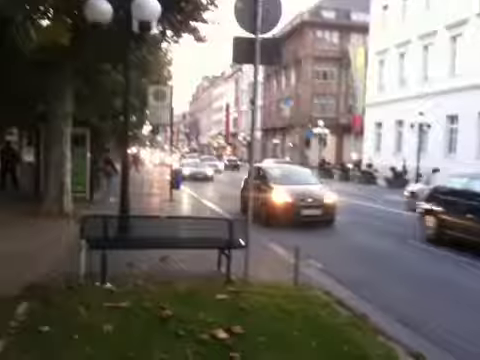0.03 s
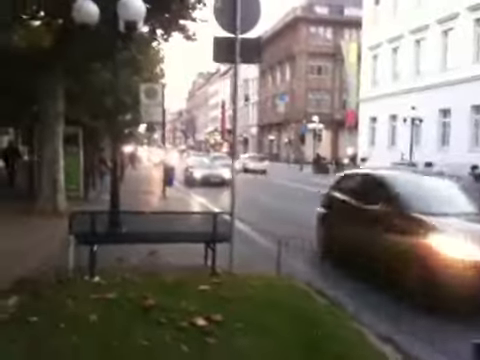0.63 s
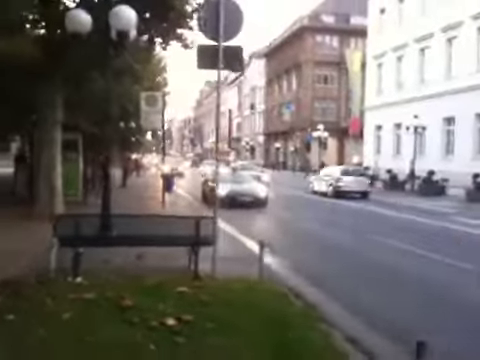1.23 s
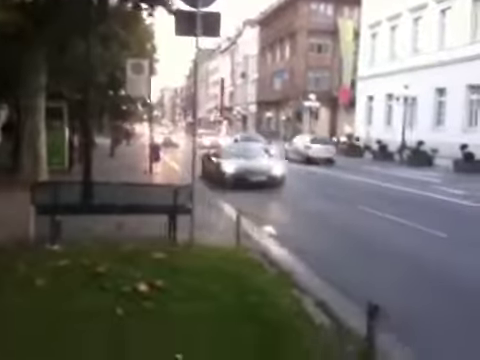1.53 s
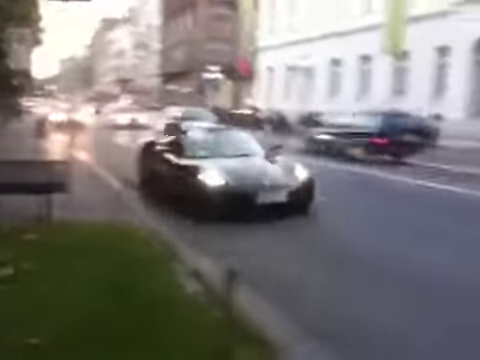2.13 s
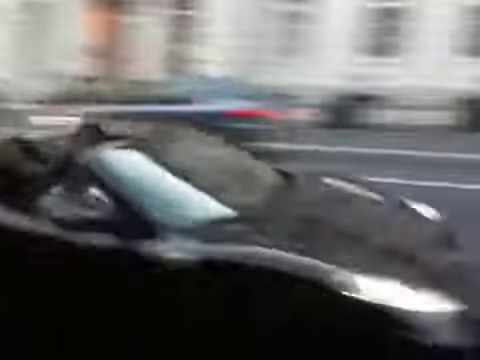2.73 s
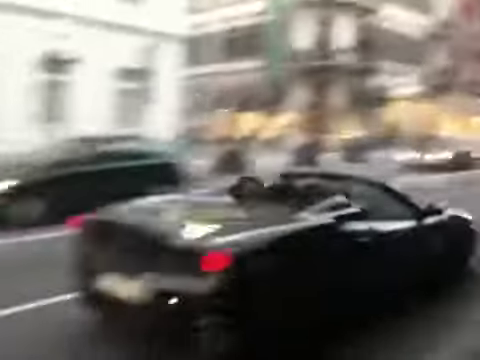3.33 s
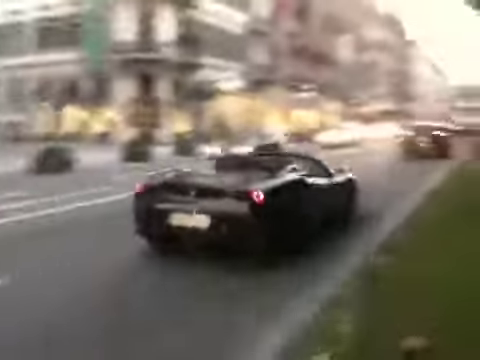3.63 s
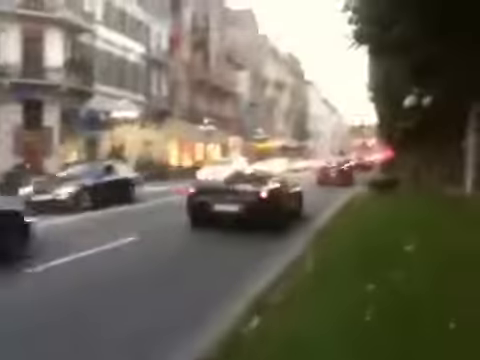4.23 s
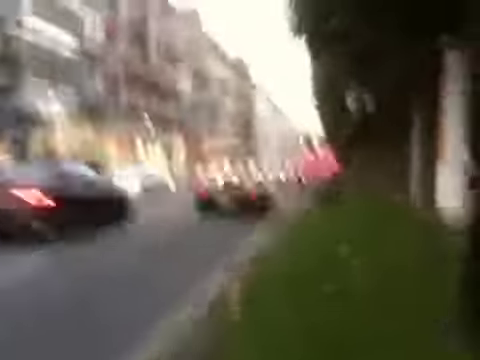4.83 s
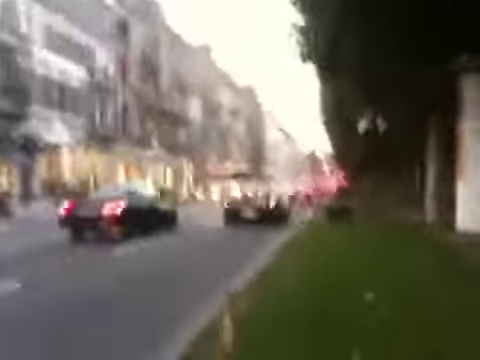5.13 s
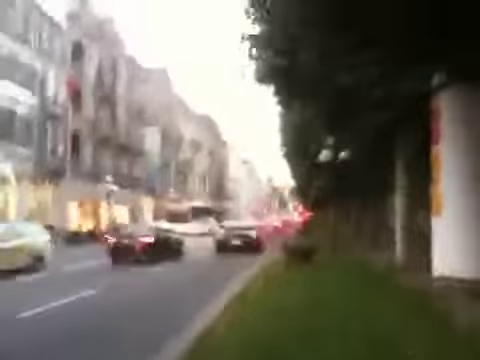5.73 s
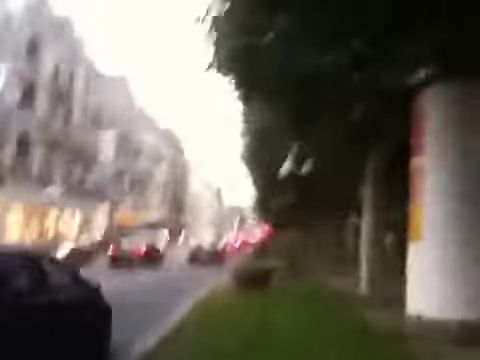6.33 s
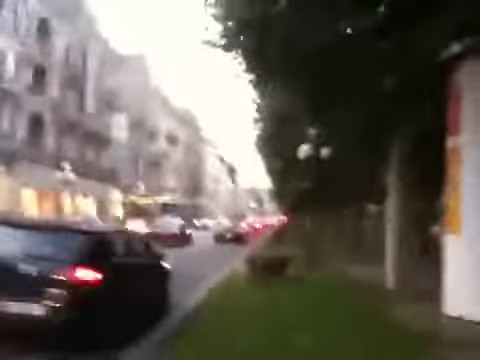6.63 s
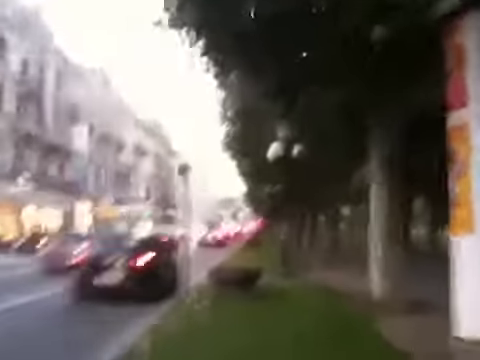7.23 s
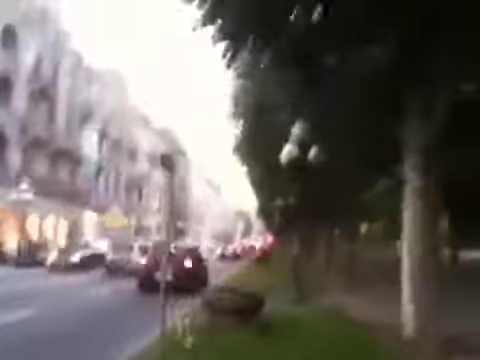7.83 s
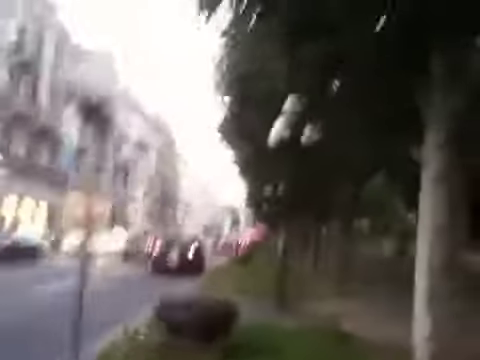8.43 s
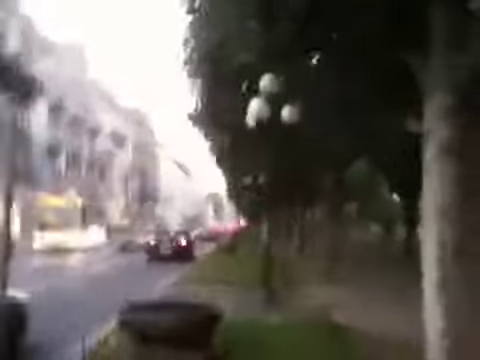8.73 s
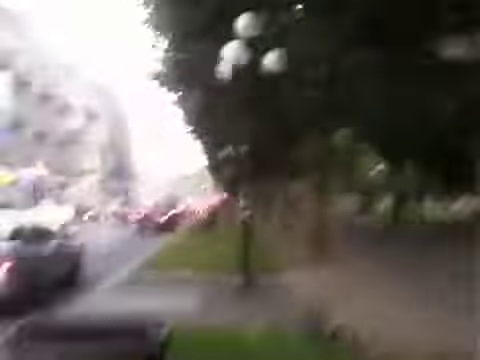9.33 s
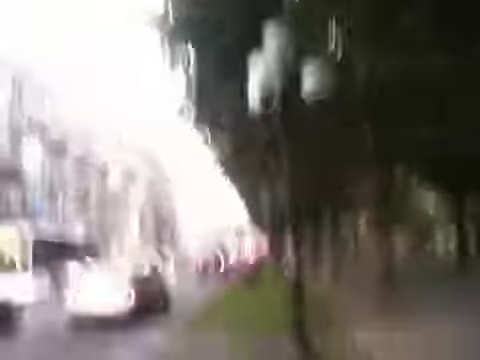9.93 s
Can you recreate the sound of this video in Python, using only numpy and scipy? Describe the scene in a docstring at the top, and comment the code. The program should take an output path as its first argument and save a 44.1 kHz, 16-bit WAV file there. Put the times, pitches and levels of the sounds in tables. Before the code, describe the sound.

Amid passing traffic, a sports car engine drones closer, blasts by with a raspy crack, then revs higher and fades with soft pops.

```python
"""A city street: a sports car cruises up, opens its throttle beside the microphone and roars away.
Periodic firing makes a harmonic drone, coloured by pipe resonances. At close range shock fronts and
turbulent gas rasp and crack; uneven combustion burbles, and unburnt fuel pops in the pipe.
Other cars roll past on hissing tyres, and the house fronts reflect the exhaust sound."""
import sys
import numpy as np
from scipy import signal
from scipy.fft import rfft, irfft
from scipy.io import wavfile
from scipy.ndimage import uniform_filter1d

SR = 44100
rng = np.random.default_rng(int(sys.argv[2]) if len(sys.argv) > 2 else 0)


def master_out(mix):
    """Clip the mix to full scale and print it as 16-bit PCM to the path in sys.argv[1]."""
    frames = np.transpose(np.atleast_2d(mix))
    ceiling = np.clip(frames, -1, 1)
    pcm = np.round(ceiling * 32767).astype(np.int16)
    wavfile.write(sys.argv[1], SR, pcm)


N = 440118
TIME = np.arange(N) / SR
PASS_S, PASS_WIDTH_S = 3.272, 0.24  # closest approach; the car's distance then, divided by its speed
BURST_PHASE = .17  # where the gas burst falls in each firing cycle [turns]
# the silencer's response: (frequency [Hz], gain [dB])
SILENCER = [(40, -31.5), (85, -29), (125, -6), (170, 4), (250, 0), (350, -3.5), (480, -9), (700, -15.5),
            (1200, -22), (3000, -63)]


def amp(db):
    """Decibels to amplitude ratio."""
    return 10 ** (np.asarray(db) / 20)


def unit(x):
    """Normalisation to rms 1."""
    return x / np.sqrt(np.mean(x ** 2) + 1e-20)


def curves(rows):
    """Linear interpolation of each column of a table over time."""
    s, *columns = np.transpose(rows)
    return [np.interp(TIME, s, c) for c in columns]


def read(points, hz):
    """Interpolation of a spectrum at hz, on a logarithmic frequency axis."""
    f, value = np.transpose(points)
    return np.interp(np.log(hz + 1), np.log(f + 1), value)


def hump(s, half_s):
    """A Gaussian envelope of height 1 around time s."""
    return np.exp(-((TIME - s) / half_s) ** 2)


def wander(hz):
    """Random modulation: noise of rms 1, low-passed at hz."""
    count = N // 64 + 2
    f = np.fft.rfftfreq(count, 64 / SR)
    slow = irfft(rfft(rng.standard_normal(count)) / (1 + (f / hz) ** 4))
    return unit(np.interp(np.arange(N) / 64, np.arange(len(slow)), slow))


def ring(colour, size=4096):
    """The minimum-phase impulse response of a body with this spectrum."""
    log_gain = np.log(amp(read(colour, abs(np.fft.fftfreq(size, 1 / SR)))))
    return np.fft.ifft(np.exp(np.conj(signal.hilbert(log_gain)))).real[:size // 2]


def through(x, colour):
    """Convolution with a body's impulse response, scaled to rms 1."""
    return unit(signal.oaconvolve(x, ring(colour))[:N])


def add(mix, s, sound):
    """Superposition: adds a sound at s seconds."""
    part = mix[max(round(s * SR), 0):][:len(sound)]
    part += sound[:len(part)]


def snap(decay_s, colour):
    """A transient: filtered noise with a Gaussian decay, of peak 1."""
    t = np.arange(900) / SR
    burst = signal.fftconvolve(rng.standard_normal(len(t)) * np.exp(-(t / decay_s) ** 2), ring(colour))
    return burst / abs(burst).max()


def tyres(colour, cars, peaks_db, floor_db, spread, rough_db):
    """Incoherent sources add in power: a noise floor plus each car, modulated by rough asphalt."""
    power = amp(floor_db) ** 2
    for (s, approach_s, retreat_s, *_), db in zip(cars, peaks_db):
        away = (TIME - s) / (spread * np.where(TIME < s, approach_s, retreat_s))
        power = power + amp(db) ** 2 / (1 + away ** 2) ** 1.56
    return np.sqrt(power) * amp(rough_db * wander(14)) * through(rng.standard_normal(N), colour)


def traffic():
    """Rolling noise: tread roar carries from the whole street; hiss and grit rise as a car nears."""
    # passing cars: (closest time [s], approach [s], retreat [s], roar [dB], hiss [dB], grit [dB])
    cars = [(1.1, 0.7, 0.3, -39, -53.5, -56), (3.149, 0.11, 0.15, -24, -66, -40.5),
            (3.62, 0.15, 0.33, -36.5, -39.5, -60), (5.76, 0.56, 0.27, -32.5, -36.5, -52),
            (7.02, 0.18, 0.42, -64.5, -46.5, -59), (8.7, 0.67, 0.48, -37, -53.5, -56.5)]
    # spectra of tread roar, hiss and grit spray: (frequency [Hz], gain [dB])
    roar_colour = [(25, -27), (50, -17), (75, -2.5), (130, -11), (250, -4.5), (450, -2), (700, -0.5),
                   (1000, 1), (1500, -4), (2200, -9), (3500, -17.5), (6000, -28.5), (10000, -38.5),
                   (16000, -63.5)]
    hiss_colour = [(600, -38), (1500, -7.5), (2500, -4), (4000, 0), (5200, -7), (7000, -16.5),
                   (10000, -23.5), (16000, -53.5)]
    grit_colour = [(3000, -35.5), (5500, -1.5), (7500, -5.5), (10000, -11), (12000, -15.5), (15500, -22.5)]
    *_, roar_db, hiss_db, grit_db = np.transpose(cars)
    roar = tyres(roar_colour, cars, roar_db, floor_db=-38, spread=1.54, rough_db=0.63)
    hiss = tyres(hiss_colour, cars, hiss_db, floor_db=-55.5, spread=0.74, rough_db=0.5)
    grit = tyres(grit_colour, cars, grit_db, floor_db=-62, spread=0.61, rough_db=1.5)
    return roar + hiss + grit


def scuff(level_db=-44.5):
    """Random amplitude modulation gives noise the grain of a short, soft scrape."""
    # spectrum of the scrape: (frequency [Hz], gain [dB])
    colour = [(800, -23), (2000, 2), (3200, 2), (5000, -12), (14000, -33)]
    grains = rng.standard_normal(N) * amp(2.7 * wander(120))
    return amp(level_db) * hump(6.64, 0.064) * through(grains, colour)


def ticks(decay_s=0.0012):
    """Brief transients are broadband: bright ticks, like grit flicked from a tyre."""
    # ticks from the road: (time [s], peak level [dB])
    flicks = [(4.236, -35), (6.243, -26), (6.646, -37), (7.33, -41)]
    # their spectrum: (frequency [Hz], gain [dB])
    colour = [(1500, -12), (4000, -2), (7500, 0), (10500, -13), (14500, -18), (16000, -30)]
    out = np.zeros(N)
    for s, db in flicks:
        add(out, s, amp(db) * snap(decay_s, colour))
    return out


def remoteness(reach_s=2.57):
    """Direct against reflected field: 0 beside the car, nearing 1 where reflections dominate."""
    return 1 - hump(PASS_S, reach_s)


def street(x, delay_s=.025, echoes_per_s=1500):
    """Reverberation: scattered echoes from the house fronts, the treble dying first."""
    # the street's decay: (frequency [Hz], reverberation time [s])
    t60 = [(100, 0.87), (500, 0.84), (2000, 0.31), (8000, 0.29)]
    taps = rng.standard_normal(SR) * (rng.random(SR) < echoes_per_s / SR) * (TIME[:SR] > delay_s)
    hz, t, spectra = signal.stft(taps, SR, nperseg=256)
    tail = signal.istft(spectra * amp(-60 * t / read(t60, hz)[:, None]), SR, nperseg=256)[1]
    return signal.oaconvolve(x, tail / np.linalg.norm(tail))[:N]


def late_echo(note, delay_s=.33, cutoff_hz=240, gain_db=-4):
    """Interference: bass returned late by distant house fronts beats against the gliding note."""
    out = np.zeros(N)
    add(out, delay_s, signal.sosfilt(signal.butter(2, cutoff_hz, fs=SR, output="sos"), note))
    return amp(gain_db) * out * remoteness() ** 2 * (TIME > PASS_S)


def throttle():
    """Engine load: a kick beside the microphone, a long pull, then the lift-off."""
    # the driver's foot: (time [s], throttle opening [0-1])
    pedal = [(2.2, 0.22), (2.6, 0.56), (2.92, 0.4), (2.97, 0.96), (3.36, 0.92), (3.385, 0.74), (3.95, 0.44),
             (4.15, 0.67), (5.6, 0.96), (6.2, 0.86), (6.4, 0.42), (7.4, 0.6), (7.9, 0.3)]
    return np.clip(curves(pedal)[0], 0, 1)


def loaded(top_db, idle_drop_db, falloff):
    """Level in dB that rises with load and falls by falloff times the spherical spreading loss."""
    spreading_db = 10 * np.log10(1 + ((TIME - PASS_S) / PASS_WIDTH_S) ** 2)
    return top_db - idle_drop_db * (1 - throttle()) - falloff * spreading_db


def burble(turns, floor_db=-41.5):
    """Impulse excitation: each firing is too strong or too weak, and the error booms in the silencer."""
    # ragged combustion as the load changes: (time [s], half length [s], level [dB])
    bouts = [(2.75, 0.28, -32), (3.147, 0.04, -15.5), (3.358, 0.024, -18.5), (3.72, 0.15, -30.5),
             (4.042, 0.059, -29.5), (5.294, 0.24, -36.5), (6.15, 0.53, -37.5), (6.706, 0.13, -34.5),
             (8.816, 0.036, -30), (9.276, 0.11, -30.5), (9.57, 0.059, -30.5), (9.893, 0.086, -25)]
    fires = np.diff(np.floor(2 * turns), prepend=0) > 0  # both cylinder banks
    kicks = fires * rng.uniform(-0.98, 1, N)
    power = amp(floor_db) ** 2 + sum(amp(db) ** 2 * hump(s, half_s) for s, half_s, db in bouts)
    return np.sqrt(power) * through(kicks, SILENCER)


def pops(gain_db=3.0, gust_db=-23, gust_s=0.013):
    """Afterfire: a pressure impulse and a short gust of gas, low-passed by the silencer."""
    # unburnt fuel igniting in the pipe: (time [s], relative peak level [dB])
    ignitions = [(3.369, -7), (4.006, -15), (4.05, -19.5), (4.063, -18), (4.073, -12.5), (6.239, -16.5),
                 (6.257, -14.5), (6.275, -20), (6.305, -18), (6.746, -21), (6.816, -27.5), (8.881, -16.5),
                 (8.893, -18), (9.161, -20), (9.274, -23), (9.31, -20.5), (9.378, -21.5), (9.903, -18),
                 (9.919, -20)]
    out, t = np.zeros(N), np.arange(3000) / SR
    muffle = signal.butter(2, 750, fs=SR, output="sos")
    for s, db in ignitions:
        gust = amp(gust_db) * rng.standard_normal(len(t)) * np.exp(-t / gust_s)
        boom = signal.sosfilt(muffle, signal.fftconvolve((t == 0) + gust, ring(SILENCER)))
        add(out, s, amp(db + gain_db) * boom / abs(boom).max())
    return out


def cracks(shock_db=-4, gas_db=-3, ping_db=-7, ping_hz=5150, ping_s=.0017):
    """Shock waves: the hardest blasts crack, with a spurt of gas and a ping of the metal tip."""
    # tailpipe blasts: (time [s], relative level [dB], decay of the spurt [s])
    blasts = [(3.036, -25, .0012), (3.2035, -20, 0.0011), (3.342, -15, 0.0013), (3.3553, -4, 0.0019),
              (3.3625, -15, .0014)]
    # their spectrum, with the pipe's metallic ring: (frequency [Hz], gain [dB])
    colour = [(300, -12), (1000, -2), (2200, -1), (3500, -2), (4500, -1), (5300, 1), (6000, -8),
              (8200, -14), (10000, -24), (15500, -44)]
    out, t = np.zeros(N), np.arange(900) / SR
    shock = ring(colour)
    ping = amp(ping_db) * np.exp(-(t / ping_s) ** 2) * np.sin(2 * np.pi * ping_hz * t)
    for s, db, decay_s in blasts:
        add(out, s, amp(db + shock_db) * shock / abs(shock).max())
        add(out, s, amp(db + gas_db) * snap(decay_s, colour))
        add(out, s, amp(db) * ping)
    return out


def rasp(turns, spread_db=3, burst_turns=.14, bark_db=-4, spit_db=-9, spit_s=0.0021, tear_db=-20):
    """A pulsed jet: each firing leaves as a shock front, a turbulent burst and a spit of random pitch."""
    # spectra of the turbulence, the shock fronts and a hoarse tearing: (frequency [Hz], gain [dB])
    gas_colour = [(30, -16), (200, -8.5), (500, -1), (1000, 0), (1500, -5), (2500, -6), (4000, -9.5),
                  (5200, -15), (7000, -23), (10000, -29.5), (15500, -50)]
    bark_colour = [(300, -43), (900, -15), (1300, -3), (1700, 3.5), (1950, -9), (2300, -3), (3000, -2.5),
                   (4000, -10.5), (5200, -17), (9000, -41)]
    tear_colour = [(300, -26), (650, 2), (850, 3), (1250, -2), (1550, -22), (5000, -42)]
    cycle = np.floor(turns).astype(int)
    strength, pitch, late = rng.uniform(-0.93, 1, (cycle[-1] + 1, 3))[cycle].T
    push = amp(spread_db * strength)
    since = turns % 1 - BURST_PHASE
    flow = .28 + push * np.exp(-(since / burst_turns) ** 2)  # some gas flows between bursts
    gas = through(flow * rng.standard_normal(N), gas_colour)
    fronts = np.diff(1. * (since > late / 80), prepend=0) > 0
    bark = amp(bark_db) * through(fronts * push, bark_colour)
    t = (since - 0.06 * late) / (SR * np.gradient(turns))  # seconds from the middle of the spit
    spit = push ** 2 * np.exp(-(t / spit_s) ** 2) * np.sin(2 * np.pi * 3600 * 1.4 ** pitch * t)
    tear = amp(tear_db) * hump(3.33, 0.043) * through(flow * rng.standard_normal(N), tear_colour)
    level_db = loaded(top_db=-25, idle_drop_db=36, falloff=1.42)
    return amp(level_db) * (gas + bark + amp(spit_db) * unit(spit)) + tear


def partial(turns, flutter):
    """Multipath fading: one engine harmonic of rms 1 whose level and phase flutter."""
    angle = 2 * np.pi * turns
    wave = (1 + flutter * wander(14.5)) * np.cos(angle) + flutter * wander(9.5) * np.sin(angle)
    return wave / np.sqrt(.5 + flutter ** 2)


def growl(hz, turns, width_hz=95):
    """Period doubling: unequal cylinders add half harmonics, picked out by a pipe resonance."""
    # the growl's band: (time [s], level [dB], centre [Hz])
    uneven = [(0, -54.5, 368), (1.7, -45, 375), (2.3, -40, 375), (2.95, -31, 366), (3.14, -19, 340),
              (3.22, -36, 345), (3.45, -40, 353), (3.65, -19, 360), (4.0, -30, 352), (4.15, -41.5, 396),
              (5.4, -39.5, 420), (5.9, -46, 440), (6.8, -57, 510), (7.35, -47, 550), (7.6, -37.5, 530),
              (8.15, -47, 469.6), (8.6, -54, 440)]
    # half harmonics: (frequency [multiples of the firing rate], relative level [dB])
    half_orders = [(1.5, -8), (2.5, 0), (3.5, -3), (4.5, -10), (5.5, -9)]
    db, centre = curves(uneven)
    gains = [amp(level) / (1 + ((k * hz - centre) / width_hz) ** 4) for k, level in half_orders]
    lines = sum(g * partial(k * turns, flutter=.2) for (k, _), g in zip(half_orders, gains))
    return amp(db) * lines / np.sqrt(sum(g ** 2 for g in gains))


def swell_db(k):
    """Amplitude modulation: harmonic k briefly swells or dips."""
    # swells and dips: (time [s], half length [s], harmonic number, gain [dB])
    swells = [(0.3, 0.29, 1, -6), (0.342, 0.028, 2, -10), (0.505, 0.062, 2, 7), (.68, 0.1, 2, -9.5),
              (1.445, 0.026, 2, -11), (1.55, 0.057, 2, 6.5), (1.68, 0.022, 2, -8), (2.096, 0.22, 2, -3.5),
              (2.278, 0.023, 2, 7.5), (2.404, 0.039, 2, -13), (2.0, 0.41, 3, 7), (2.8, 0.046, 3, 9.5),
              (2.658, 0.15, 1, 11), (3.023, 0.078, 3, 9.5), (3.083, 0.037, 7, -22), (3.043, 0.059, 6, -7),
              (3.233, 0.028, 4, 10), (3.268, 0.05, 5, -17), (3.272, 0.045, 1, 1.5), (3.53, 0.16, 4, -9.5),
              (3.58, 0.11, 3, -2), (3.6, 0.15, 6, -9), (3.627, 0.28, 2, -9), (3.829, 0.035, 1, -7.5),
              (3.88, 0.24, 4, 7.5), (4.158, 0.058, 6, 9.5), (4.3, 0.2, 2, -9.5), (4.45, .2, 4, -3),
              (4.523, .04, 1, -3), (4.722, .04, 1, -9), (4.744, 0.036, 3, -4.5), (4.9, 0.61, 8, 7.5),
              (5.03, 0.01, 3, -3.5), (5.118, 0.066, 3, 7), (5.25, 0.029, 3, -19), (5.36, 0.077, 1, 2.5),
              (5.382, 0.036, 3, -12), (5.52, 0.21, 2, -14), (5.592, 0.034, 1, -14), (5.62, 0.22, 5, 3),
              (5.68, 0.072, 3, -4), (6.018, 0.05, 2, -6), (6.14, 0.12, 4, 15.5), (6.158, 0.11, 5, 9.5),
              (6.38, .03, 1, 2.5), (6.422, 0.072, 2, 9.5), (6.526, 0.019, 1, -10), (6.613, 0.016, 1, -7),
              (6.655, 0.028, 1, 6), (6.688, .012, 1, -11), (6.862, .018, 1, -12), (6.897, 0.041, 2, 6),
              (7.122, 0.042, 1, -7), (6.692, 0.019, 2, -8), (7.052, 0.056, 2, 5.5), (7.063, 0.05, 3, 4),
              (7.3, 0.48, 5, 8.5), (8.05, 0.45, 4, 24), (8.1, 0.59, 2, 5), (8.552, 0.41, 3, 4)]
    return sum(db * hump(s, half_s) for s, half_s, harmonic, db in swells if harmonic == k)


def tailpipe(hz):
    """Resonance: the gain that a high harmonic meets as it glides through the pipe's modes."""
    # spectral envelope of the blare: (frequency [Hz], gain [dB])
    colour = [(400, -12), (570, -4), (1000, 1), (1500, -11), (2000, -14), (3500, -20.5)]
    # tailpipe resonances: (frequency [Hz], half width [Hz], lift [dB])
    howl = [(742, 170, 15.5), (1050, 11, 11)]
    return amp(read(colour, hz) + sum(db / (1 + ((hz - f) / width) ** 2) for f, width, db in howl))


def blare(hz, turns, dispersion=0.0076, steepen=0.29):
    """Nonlinear steepening: strong pulses turn brassy, tilting harmonics 5 to 24 towards the treble."""
    # bands that flare up as the tailpipes sweep by:
    # (time [s], half length [s], centre [Hz], half width [Hz], lift [dB])
    flares = [(3.038, 0.069, 1900, 700, 12.5), (3.277, 0.051, 1050, 150, 10)]
    level_db = loaded(top_db=-20.5, idle_drop_db=27.5, falloff=0.8)
    orders = range(5, 25)
    slope = steepen * np.clip((level_db + 46) / 10, -1, 1)
    gains = [tailpipe(k * hz) * k ** slope for k in orders]
    flutter = .2 + 1.6 * remoteness()
    out = np.zeros(N)
    for k, gain in zip(orders, gains):
        flare_db = sum(db * hump(s, half_s) / (1 + ((k * hz - centre) / width) ** 2)
                       for s, half_s, centre, width, db in flares)
        wave = partial(k * (turns - BURST_PHASE) + dispersion * k ** 2, flutter)
        out += gain * amp(swell_db(k) + flare_db) * wave
    return amp(level_db) * out / np.sqrt(sum(g ** 2 for g in gains))


def harmonic_db(k, hz, brighten_db=22.5):
    """Source and filter: low harmonic k is direct beside the car, coloured by pipe and load afar."""
    # base level of the exhaust note: (time [s], level [dB])
    loudness = [(0, -41), (2.1, -31.5), (2.6, -25), (2.92, -17.5), (3.36, -18), (3.55, -17.5), (3.72, -18),
                (3.82, -16.5), (3.93, -14.5), (3.985, -15.5), (4.02, -27.5), (4.08, -34), (4.125, -20),
                (4.3, -16.5), (4.6, -14.5), (5.17, -20.5), (5.25, -16), (5.6, -19.5), (5.88, -15),
                (6.1, -21.5), (6.4, -29), (7.1, -26.5), (7.6, -38), (8.4, -37), (9.4, -32.5), (10, -33)]
    # harmonics 1 to 4 beside the car, and further off: (gain [dB])
    beside_db = [8.5, 3.5, -4.5, -5]
    afar_db = [1.5, 1.5, -0.5, -8.5]
    # the pipe's low resonances: (frequency [Hz], gain [dB])
    pipe = [(95, -20.5), (120, -16), (145, 1), (180, 1.5), (215, 0.5), (270, -11.5), (312, -10), (345, -4),
            (390, 1.5), (440, -8), (520, -14), (600, -17), (740, -29)]
    beside = (np.tanh((TIME - 2.936) / 0.051) - np.tanh((TIME - 3.777) / 0.19)) / 2
    tilt_db = brighten_db * (throttle() - .5)  # per octave
    coloured_db = afar_db[k - 1] + read(pipe, k * hz) + tilt_db * np.log2(k / 2)
    return curves(loudness)[0] + beside * beside_db[k - 1] + (1 - beside) * coloured_db + swell_db(k)


def drone(hz, turns, dispersion=0.1018):
    """Periodic firing gives four strong harmonics; dispersion in the pipe rounds off the pulses."""
    # smearing of harmonics 1 to 4 by reflections as the car drives off: (flutter depth [ratio])
    smears = [.12, .2, .06, .6]
    waver = .22 * hump(5.86, 0.26)  # under full load, further up the street, the note breaks up
    scatter = .11 + .2 * remoteness() ** 2 + waver
    out = np.zeros(N)
    for k, smear in enumerate(smears, 1):
        flutter = scatter + smear * hump(4.5, .9)
        out += amp(harmonic_db(k, hz)) * partial(k * turns + dispersion * k ** 2, flutter)
    return out


def scene(note_echo_db=-22, noise_echo_db=-11):
    """Superposition: exhaust sounds locked to one crankshaft, pops and cracks, echoes and the road."""
    # engine speed as heard, Doppler shift included: (time [s], firing rate of one cylinder bank [Hz])
    firing = [(0.1, 107.6), (1.17, 107.3), (2.08, 104), (2.43, 105), (2.86, 104.8), (2.925, 108.5),
              (2.99, 132.5), (3.034, 137), (3.08, 146), (3.2, 141.0), (3.3, 146), (3.36, 147.5),
              (3.44, 136.5), (3.55, 136), (3.7, 141), (3.86, 133), (4.0, 131), (4.2, 130.7), (4.39, 131),
              (4.5, 127.5), (4.77, 130.5), (5.19, 139.5), (5.57, 160.0), (5.86, 175), (6.2, 183.5),
              (6.4, 180), (6.58, 177), (6.96, 167), (7.49, 154), (8.06, 136.5), (8.75, 118.5), (9.31, 102),
              (9.98, 94)]
    hz = uniform_filter1d(curves(firing)[0], size=1200)
    hz *= 1 + .003 * wander(9)  # combustion is never quite even
    jitter = .009 * remoteness() * wander(30)  # shifting echo paths roughen the far note
    turns = np.cumsum(hz * (1 + jitter)) / SR
    wadding = signal.butter(4, 2400, fs=SR, output="sos")  # the silencer's packing absorbs treble
    note = signal.sosfilt(wadding, drone(hz, turns) + blare(hz, turns) + growl(hz, turns))
    noise = signal.sosfilt(wadding, burble(turns)) + pops() + rasp(turns)
    echo = street(amp(note_echo_db) * note + amp(noise_echo_db) * noise)
    return (note + noise + echo + late_echo(note) + cracks() + ticks() + scuff() + traffic())[None]


def record(dry, ceiling=.74, knee=5, start_s=.083, edge_hz=15800):
    """Saturation and band limiting: the microphone cuts deep bass and overloads softly at the pass."""
    # the microphone's low cut: (frequency [Hz], gain [dB])
    low_cut = [(10, -31.5), (45, -9.5), (75, -10.5), (105, -1), (16000, -1.5)]
    thinned = signal.oaconvolve(dry, ring(low_cut)[None])[:, :N]
    rounded = thinned / (1 + abs(thinned / ceiling) ** knee) ** (1 / knee)
    centred = signal.sosfilt(signal.butter(1, 45, "high", fs=SR, output="sos"), rounded)
    faded_in = centred * np.clip((TIME - start_s) / .003, 0, 1)
    return signal.sosfilt(signal.ellip(10, .1, 90, edge_hz, fs=SR, output="sos"), faded_in)


dry = scene()
out = record(dry)
master_out(out)
```